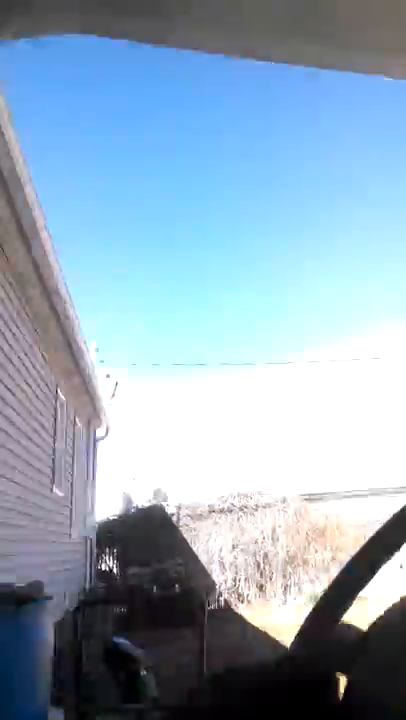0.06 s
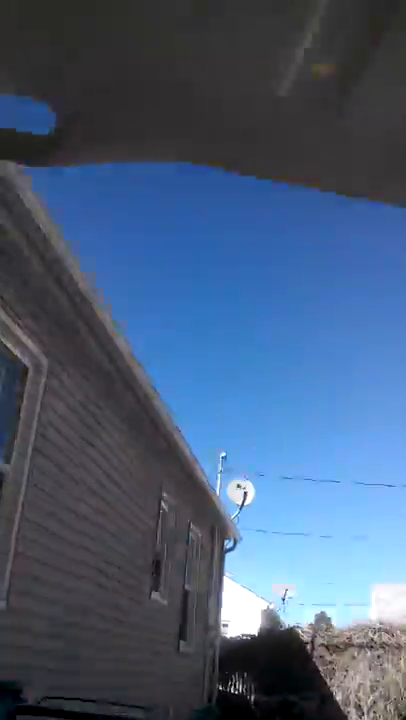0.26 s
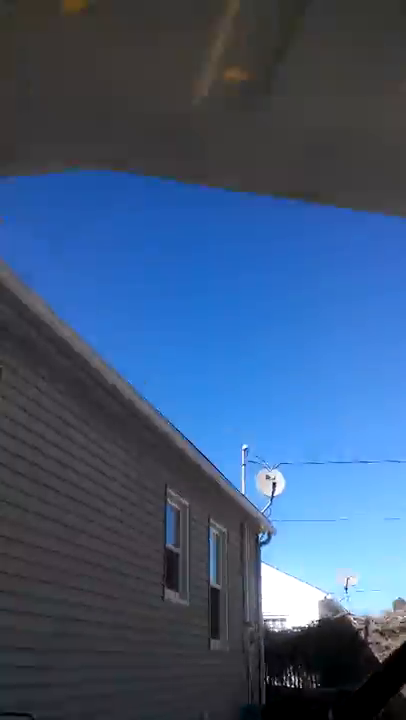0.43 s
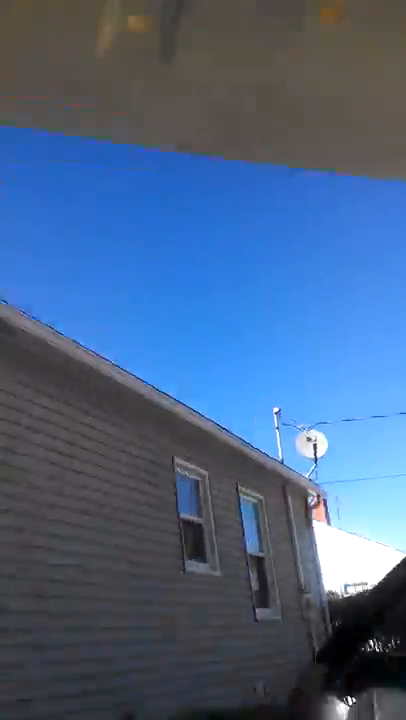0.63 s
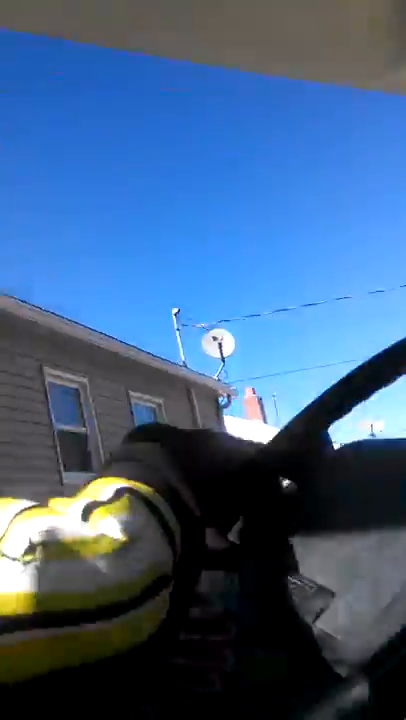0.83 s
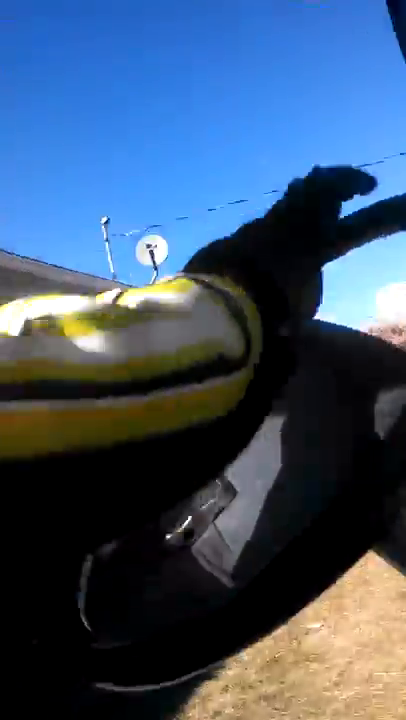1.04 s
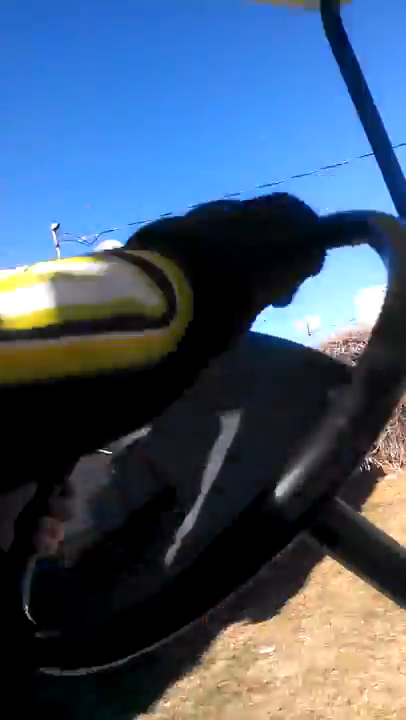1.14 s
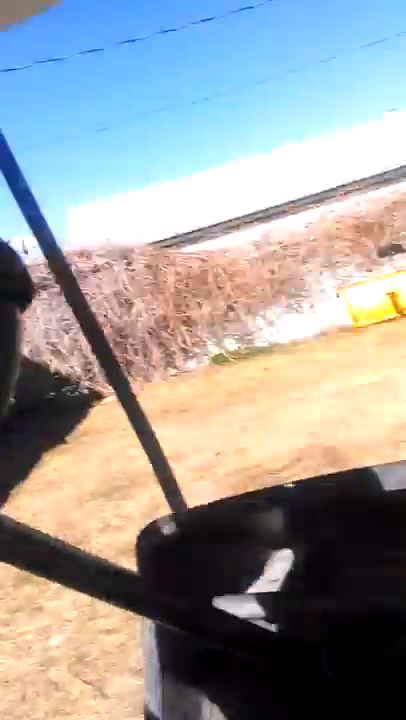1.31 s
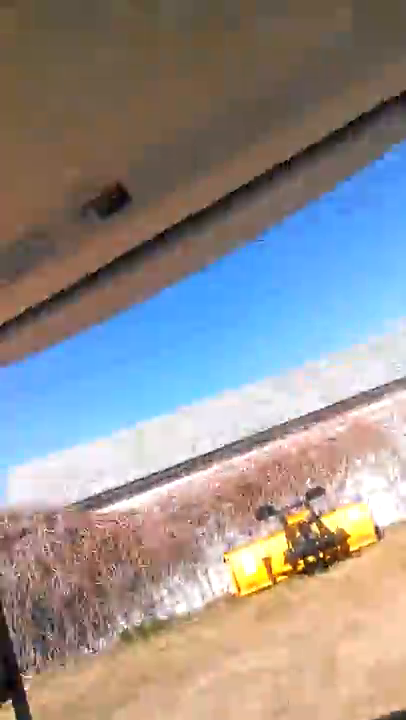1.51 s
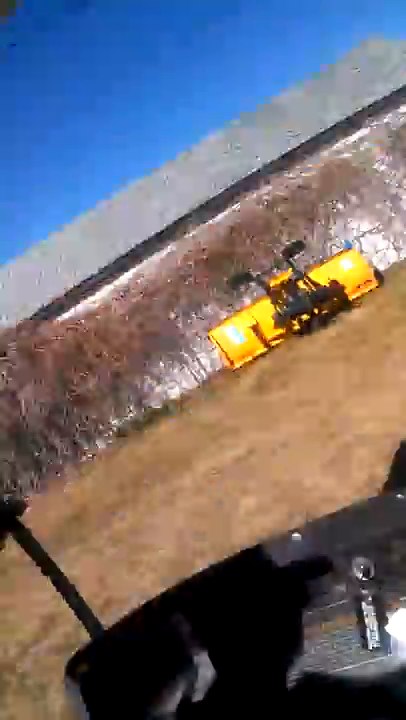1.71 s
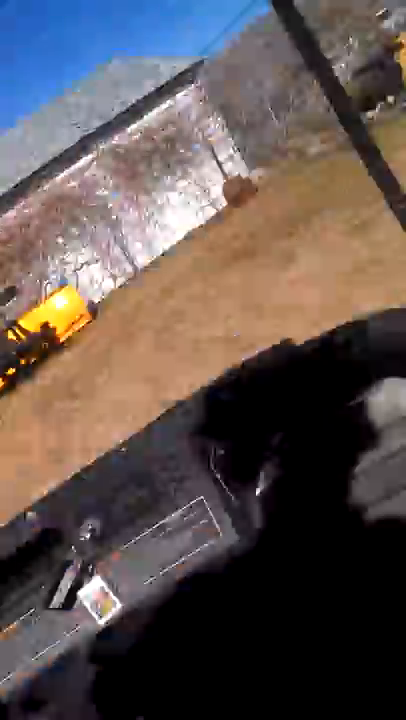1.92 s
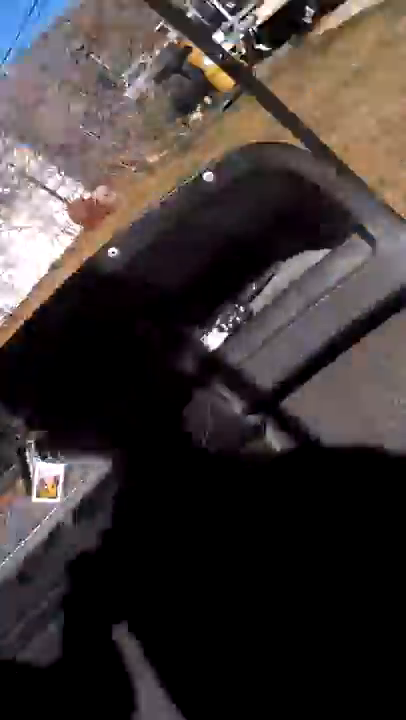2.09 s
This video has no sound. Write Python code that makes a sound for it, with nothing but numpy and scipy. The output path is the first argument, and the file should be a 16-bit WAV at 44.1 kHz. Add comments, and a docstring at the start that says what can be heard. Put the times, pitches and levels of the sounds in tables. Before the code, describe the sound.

A small electric cart rolls over a bumpy yard, heard from a phone held aboard. A quiet low rumble and faint hum open; at 0.24 s a loud roar, crunching grass and hollow plastic knocks burst in, strongest until 0.6. Rattles and sleeve rustle continue, with sharp scraping knocks near 1.0 s. Then it fades to dull thuds, tiny clacks, faint hiss and a very high electric whine.

```python
"""A low rumble and roar swell into a burst of knocks: an electric cart rolls over a bumpy yard.
The tread's roar, made of tiny impacts, rings the plastic body over a crunch of grass and soil.
Air noise and dull jolts buffet the phone in the driver's hand; bumps knock the body, loose parts clack.
A jacket sleeve rustles, scrapes and judders in grains and wavering tones beside the phone.
Behind it all, two low tones of the drive fade under a thin electric whine and a faint hiss."""
import sys
import numpy as np
from scipy import signal
from scipy.fft import rfft, irfft
from scipy.io import wavfile
from scipy.ndimage import uniform_filter1d

SR = 44100
rng = np.random.default_rng(int(sys.argv[2]) if len(sys.argv) > 2 else 0)


def waveform_to_disk(signal):
    """Save audio, clipped to [-1, 1], as 16-bit WAV at the path in sys.argv[1]."""
    frames = np.transpose(np.atleast_2d(signal))
    scaled = np.clip(frames, -1, 1) * 32767
    samples = np.round(scaled).astype(np.int16)
    wavfile.write(sys.argv[1], SR, samples)


N = 94815
T = np.arange(N) / SR  # seconds
LN_60DB = np.log(1000)  # a fall of 60 dB

# Modes of the plastic body. Each row: pitch in Hz, level of a blow's ring in dB, t60 in seconds.
BODY_MODES = [(251.8, 1.5, 0.069), (314.1, 0, 0.088), (341, -7.5, 0.19), (447, -10.5, 0.11),
              (517, -12.5, 0.087), (721, -7.5, 0.054), (994, -7.5, 0.035), (1290, -14, 0.04),
              (1545, -11.5, 0.051), (1800, -15.5, 0.051), (2396, -14, 0.097), (4020, -26, 0.14)]


def undb(db):
    """Decibels to gain."""
    return 10 ** (np.asarray(db) / 20)


def unit(x):
    """Scale to an rms of 1."""
    return x / np.sqrt(np.mean(x ** 2))


def curve(rows):
    """Gain along a curve of (seconds, dB) points."""
    seconds, db = np.array(rows).T
    return undb(np.interp(T, seconds, db))


def walk(rate):
    """Smooth random drift with an rms of 1; a higher rate (per second) drifts faster."""
    width = max(int(SR / rate), 2)
    smooth = uniform_filter1d(rng.standard_normal(N), width, mode="wrap")
    return unit(uniform_filter1d(smooth, width, mode="wrap"))


def wavering_tone(hz, waver, rate):
    """Sine whose pitch drifts by a fraction (rms) of itself."""
    return np.sin(2 * np.pi * np.cumsum(hz * (1 + waver * walk(rate))) / SR)


def ring(x, response):
    """Pass both ports through an impulse response."""
    return signal.fftconvolve(x, response[None], axes=1)[:, :N]


def colour(x, points):
    """Minimum-phase filter of unit energy through (Hz, dB) points."""
    size = 4096
    hz, db = np.array(points).T
    f = np.maximum(np.fft.rfftfreq(size, 1 / SR), 1)
    spectrum_db = np.interp(np.log(f), np.log(hz), db)
    cepstrum = irfft(np.log(undb(spectrum_db)))
    # fold the cepstrum forward in time, so that nothing sounds before its cause
    cepstrum[1:size // 2] *= 2
    cepstrum[size // 2 + 1:] = 0
    response = irfft(np.exp(rfft(cepstrum)))
    return ring(x, response / np.linalg.norm(response))


def ports(x, likeness):
    """Mix two unrelated signals into two with the given correlation."""
    shared = np.sqrt(1 + likeness) * x[0]
    opposed = np.sqrt(1 - likeness) * x[1] * np.array([[1], [-1]])
    return (shared + opposed) / np.sqrt(2)


def grit(rate, spread_db):
    """Two streams of tiny impacts of uneven size, struck at the same random moments (rate per second)."""
    struck = rng.random(N) < rate / SR
    size = undb(spread_db * np.clip(rng.standard_normal(N), -2, 2))
    return unit(struck * size * rng.standard_normal((2, N)))


def bursts(rows, attack_s, decay_s):
    """Envelope of (start s, dB, length s) events that rise, hold and die away; overlaps add in power."""
    power = 0
    for start, db, length in rows:
        rise = np.clip((T - start) / attack_s, 0, 1)
        fall = np.exp(-np.maximum(T - start - length, 0) / decay_s)
        power = power + (undb(db) * rise * fall) ** 2
    return np.sqrt(power)


def ping(hz, t60):
    """A short damped ring of unit energy."""
    t = T[:SR // 40]
    tone = np.sin(2 * np.pi * hz * t) * np.exp(-LN_60DB * t / t60)
    return tone / np.linalg.norm(tone)


def panels(x, ring_db):
    """Add the ringing of the body's modes to a sound, each mode with the same gain."""
    t = T[:SR // 4]
    response = 0
    for hz, _, t60 in BODY_MODES:
        even_gain = 2 * LN_60DB / (t60 * SR)
        response = response + even_gain * np.cos(2 * np.pi * hz * t) * np.exp(-LN_60DB * t / t60)
    return (x + undb(ring_db) * ring(x, response)) / np.sqrt(1 + undb(ring_db))


def tyres():
    """Tread crushing grass and soil: a roar carried by the body and a crunch heard through the air."""
    # Tyre roar before its drift and trim. Each row: time in seconds, level in dB.
    roll_level = [(0, -37), (.22, -30.5), (.245, -16.5), (.31, -22), (.325, -18.5), (.335, -16.5),
                  (.41, -15), (.5, -22.5), (.6, -25.5), (.73, -29.5), (.765, -27.5), (.96, -27), (1.1, -36),
                  (1.37, -40.5), (1.68, -48), (1.9, -41), (2.07, -41.5), (2.15, -32)]
    # Tone of the roar before the body rings. Each row: frequency in Hz, relative density in dB per Hz.
    roll_colour = [(60, -28), (140, 4.5), (300, 8), (420, -1.5), (550, -7.5), (750, -17.5), (1100, -29),
                   (1700, -28.5), (2600, -35), (5000, -40.5), (15000, -68)]
    # Crunch under the tread before its trim. Each row: time in seconds, level in dB.
    crunch_level = [(0, -42.5), (.228, -42.5), (.243, -26), (.3, -36.5), (.324, -37), (.335, -23.5),
                    (.42, -29.5), (.58, -56), (.74, -50), (.76, -28.5), (.81, -47), (.86, -28.5),
                    (.95, -38), (1.06, -40), (1.16, -58), (1.32, -51), (1.39, -41.5), (1.45, -48.5),
                    (1.69, -55), (1.76, -42), (1.82, -61), (1.9, -45), (1.99, -57), (2.15, -40.5)]
    # Filter that tones the crunch. Each row: frequency in Hz, relative gain in dB.
    crunch_colour = [(200, -27), (450, 5.5), (700, 2.5), (1200, -3), (1800, -18.5), (2800, -6), (6000, -24)]
    grains = colour(ports(grit(rate=2500, spread_db=0), likeness=0.81), roll_colour)
    roar = unit(panels(grains, ring_db=-1)) * curve(roll_level)
    crunch = unit(colour(crumbs(), crunch_colour)) * curve(crunch_level)
    return roar * undb(-1.5 + 2 * walk(17)) + undb(-4.5) * crunch


def crumbs():
    """Stalks and crumbs of soil snap one by one, each a brief grain at one of ten pitches."""
    cycles = 5  # cycles of ring until a grain has fallen by 60 dB
    total = 0
    for hz in np.geomspace(400, 4000, 10):
        snaps = ports(grit(rate=170, spread_db=2), likeness=0.15)
        total = total + ring(snaps, ping(hz, cycles / hz))
    return unit(total)


def rumble():
    """Low buffeting of ride and air, a drifting filtered noise, with short dull jolts on top."""
    # Ride and air before their drift. Each row: time in seconds, level in dB.
    rumble_level = [(0, -31.5), (.22, -28), (.34, -19.5), (.52, -23.5), (.68, -32), (.86, -27.5),
                    (.95, -31), (1.3, -35), (1.4, -42), (1.55, -34.5), (1.72, -42.5), (1.93, -34.5),
                    (2.0, -24), (2.05, -36.5), (2.15, -30.5)]
    # Tone of ride and air. Each row: frequency in Hz, relative density in dB per Hz.
    rumble_colour = [(20, -89), (35, -23), (55, 0), (100, 1.5), (150, 0.5), (230, -16.5), (500, -31),
                     (1500, -101)]
    # Jolts of the phone. Each row: peak in seconds, level in dB before the port gains, pitch in Hz.
    thumps = [(0.26, -17, 130), (0.35, -7.5, 240), (0.366, -17, 52), (0.369, -9, 130), (0.3923, -3, 410),
              (0.44, -11.5, 116), (.468, -16, 317), (.525, -15, 105), (0.565, -5.5, 109.5),
              (0.586, -26, 90), (0.634, -20, 109), (0.66, -16.5, 78.4), (.684, -16, 106), (0.704, -20, 60),
              (0.707, -27, 280), (.745, -21.5, 250), (0.79, -16, 95), (0.878, -20, 120), (1.16, -29, 90),
              (1.183, -21.5, 114), (1.23, -22, 90), (1.272, -26, 62), (1.307, -19, 212), (1.317, -20, 74.6),
              (1.459, -26, 78.5), (1.518, -19, 103), (1.521, -27.5, 263), (1.609, -21.5, 148),
              (1.786, -24, 101), (1.826, -30, 70.4), (1.945, -26, 230), (1.991, -19.5, 100),
              (2.029, -18.5, 68.5), (2.073, -21, 79), (2.14, -20, 175)]
    spread_cycles = 0.49  # standard deviation of a jolt's bell-shaped envelope
    noise = colour(ports(rng.standard_normal((2, N)), likeness=0.24), rumble_colour)
    air = noise * curve(rumble_level) * undb(3.5 * walk(14))
    jolts = 0
    for peak, db, hz in thumps:
        bell = np.exp(-((T - peak) * hz / spread_cycles) ** 2 / 2)
        jolts = jolts + undb(db) * np.cos(2 * np.pi * hz * (T - peak)) * bell
    return air + jolts * np.array([[.2], [1.6]])  # the jolts reach mostly the right port


def knocks():
    """Each bump pushes on the body for a moment; a longer contact sounds duller."""
    # Bumps. Each row: start in seconds, level in dB before the trims, contact in seconds.
    bumps = [(0.238, -23, 0.0018), (.247, -23.5, 0.0022), (.26, -15.5, 0.0021), (0.284, -8.5, 0.0069),
             (.335, -23, 0.00072), (.347, -20, 0.0032), (.378, -19.5, 0.0014), (.392, -18, 0.0014),
             (.406, -11, 0.0025), (0.433, -16.5, 0.0037), (0.464, -27.5, 0.00087), (0.495, -17.5, 0.0027),
             (.552, -17.5, 0.0027), (.683, -34, 0.0041), (0.769, -28.5, 0.003), (.991, -13, 0.00063),
             (1.024, -15.5, 0.00054), (1.497, -42, 0.0023), (1.605, -45, 0.0023), (1.89, -40, 0.0016),
             (2.025, -30, 0.0042), (2.138, -39, 0.002)]
    out = np.zeros((2, N + SR))
    t = T[:SR // 50]
    for start, db, contact in bumps:
        first = int(start * SR)
        push = t * np.exp(-t / (contact / 10))  # peaks at a tenth of the contact
        for port in range(2):
            sound = signal.fftconvolve(body(spread_db=4), push / push.sum())
            out[port, first:first + len(sound)] += undb(db + 1) * sound
    return out[:, :N] * np.array([[.8], [.9]])


def body(spread_db):
    """Ring of the body; each mode's weight and pitch vary at random from call to call."""
    t = T[:SR // 8]
    total = 0
    for hz, db, t60 in BODY_MODES:
        gain = undb(db + spread_db * rng.standard_normal())
        varied_hz = hz * (1 + .02 * rng.uniform(-0.84, 1))
        total = total + gain * np.sin(2 * np.pi * varied_hz * t) * np.exp(-LN_60DB * t / t60)
    return total


def clacks():
    """Loose parts hit with a sharp tick and chatter briefly, each ringing at its own pitch."""
    # Hits. Each row: start in seconds, level in dB before the trims, length in seconds, part's pitch in Hz.
    hits = [(0.234, -38, 0.0032, 2120), (.328, -25, 0.0081, 1510), (0.346, -41, 0.0034, 1070),
            (0.39, -20.5, 0.0026, 915), (0.434, -32.5, 0.0016, 1500), (0.549, -32, 0.002, 1930),
            (.552, -29, 0.0029, 530), (0.751, -30, 0.011, 700), (0.81, -36, 0.0023, 1740),
            (0.854, -32, 0.0034, 800), (1.018, -30.5, .003, 1850), (1.023, -28, 0.0041, 510),
            (1.116, -35.5, .001, 3680), (1.187, -31.5, 0.00091, 3060), (1.188, -34.5, 0.0049, 1920),
            (1.191, -36, 0.0025, 540), (1.253, -44, .002, 4360), (1.27, -38.5, 0.0019, 3540),
            (1.274, -33.5, 0.0077, 710), (1.333, -41.5, 0.003, 870), (1.344, -41.5, 0.012, 1920),
            (1.376, -40.5, 0.011, 1920), (1.459, -44, 0.0017, 4300), (1.518, -46.5, 0.0018, 1180),
            (1.768, -50, .002, 3600), (1.895, -47.5, 0.013, 620), (2.004, -51.5, .002, 800),
            (2.099, -45, 0.02, 1190), (2.142, -35.5, 0.0085, 1240)]
    # Filter on the bare contacts. Each row: frequency in Hz, relative gain in dB.
    clack_colour = [(200, -13), (480, 13.5), (700, 14.5), (1000, 2.5), (1900, -1), (3300, -2.5),
                    (4700, -11.5), (8000, -12.5), (15000, -31)]
    contacts, rings = 0, 0
    for start, db, length, hz in hits:
        envelope = bursts([(start, db, length)], attack_s=.0005, decay_s=0.008)
        chatter = ports(grit(rate=4300, spread_db=2), likeness=0.038) * envelope
        chatter[0, int(start * SR)] += undb(db + 18)  # the tick, at the left port alone
        contacts = contacts + chatter
        rings = rings + ring(chatter, ping(hz, t60=0.006))
    return undb(-0.5) * (colour(contacts, clack_colour) + undb(-3.5) * rings) / np.sqrt(2)


def sleeve():
    """Stiff cloth rustles in fine grains and now and then catches in a loud scrape."""
    # Rustle before its drift, body ring and trim. Each row: time in seconds, level in dB.
    rustle_level = [(0, -56), (.23, -56.5), (.25, -35.5), (.3, -46), (.37, -49.5), (.4, -39), (.55, -43.5),
                    (.61, -47), (.69, -51), (.76, -44.5), (.87, -43), (.92, -41.5), (.97, -33.5),
                    (1.04, -41.5), (1.08, -48.5), (1.2, -58), (1.5, -62.5), (2.15, -61)]
    # Tone of the rustle before the body rings. Each row: frequency in Hz, relative density in dB per Hz.
    rustle_colour = [(200, -21.5), (700, 6.5), (1600, -0.5), (2600, -3), (4200, -2), (7000, -7.5),
                     (11000, -11), (15500, -16.5)]
    # Short gritty scrapes. Each row: start in seconds, level in dB before ring and trim, length in seconds.
    scrapes = [(.238, -40.5, 0.0041), (.269, -40, 0.0018), (.38, -33.5, 0.0024), (.405, -21, 0.0083),
               (.457, -26, 0.005), (.481, -34, 0.005), (.513, -34.5, 0.0014), (.527, -32.5, 0.0017),
               (.549, -28, 0.0022), (.563, -34, 0.002), (.621, -35, 0.012), (.752, -39, 0.008),
               (.789, -33.5, 0.0013), (.827, -37, 0.0048), (.904, -36, 0.0041), (.989, -17, 0.0033),
               (1.027, -16.5, 0.0045), (1.1165, -38.5, 0.00076), (1.348, -44, 0.0068), (2.037, -49.5, .002)]
    # Tone of the scrapes before the body rings. Each row: frequency in Hz, relative density in dB per Hz.
    scrape_colour = [(200, 9.5), (700, -6), (1600, 1), (2600, -1), (4200, 1), (7000, -3.5), (11000, -5),
                     (15500, -13)]
    fine = ports(grit(rate=12000, spread_db=3), likeness=0.011)
    rustle = colour(fine, rustle_colour) * curve(rustle_level) * undb(2 * walk(67))
    rough = ports(grit(rate=12000, spread_db=3), likeness=0.061)
    scrape = colour(rough * bursts(scrapes, attack_s=.001, decay_s=0.0066), scrape_colour)
    return panels(rustle + scrape, ring_db=-4.5) * undb(np.array([[4.5], [-1.5]]))  # stronger at the left


def judders():
    """The catching sleeve sticks and slips, shaking the phone for a few uneven cycles."""
    # Slips. Each row: start in seconds, level in dB before the trims, length in seconds, mean pitch in Hz.
    slips = [(0.341, -13.5, 0.009, 245), (0.419, -19.5, 0.0098, 315), (0.517, -21, 0.011, 310),
             (0.616, -22.5, 0.0095, 290), (0.642, -26.5, 0.0051, 340), (0.851, -19.5, 0.011, 304.5),
             (0.988, -13, 0.0076, 305), (1.006, -15, 0.0076, 275), (1.021, -12.5, 0.0059, 300)]
    shake = 0
    for start, db, length, hz in slips:
        envelope = bursts([(start, db, length)], attack_s=0.0022, decay_s=0.012)
        shake = shake + envelope * wavering_tone(hz, waver=0.0603, rate=149)
    return undb(2) * shake * np.array([[1.1], [1.7]])  # felt most at the right port


def hum():
    """The drive hums in two tones of nearly steady pitch and fades."""
    # Tones. Each row: mean pitch in Hz, rms level in dB before drift and fade.
    hum_tones = [(307, -48.5), (635, -49.5)]
    fade_db_per_s = 13.5
    tones = sum(undb(db + 2 * walk(19)) * wavering_tone(hz, waver=.004, rate=20) for hz, db in hum_tones)
    return np.sqrt(2) * tones * undb(-fade_db_per_s * T)


def whine():
    """A thin electric tone over a faint filtered-noise hiss that swells and sinks with it."""
    # Whine before its drift and trim. Each row: time in seconds, level in dB.
    whine_level = [(0, -59), (.37, -55), (.41, -62.5), (.95, -58.5), (1.06, -68), (2.15, -57)]
    # Tone of the hiss. Each row: frequency in Hz, relative density in dB per Hz.
    hiss_colour = [(300, 11), (1500, 12), (2600, -8), (4000, -3), (7000, -7.5), (10000, -1.5), (15000, -20)]
    level = curve(whine_level)
    tone = np.sqrt(2) * wavering_tone(12208, waver=.00005, rate=6.7)
    hiss = colour(ports(rng.standard_normal((2, N)), likeness=0.044), hiss_colour)
    return undb(1.5) * level * tone * undb(.5 * walk(60)) + undb(-61) * unit(level) * hiss


def scene():
    """All sounds at the two microphone ports."""
    return tyres() + rumble() + knocks() + clacks() + sleeve() + judders() + hum() + whine()


def record(dry):
    """The phone widens the stereo by taking each port, delayed, from the other, rounds peaks, cuts the top."""
    cross, lag_samples, top_hz = .98, 16, 15700
    delayed = np.pad(dry[::-1], ((0, 0), (lag_samples, 0)))[:, :N]
    wide = (dry - cross * delayed) / np.sqrt(1 + cross ** 2)
    rounded = np.tanh(wide * undb(np.array([[-1], [1]])))  # right side driven 2 dB harder than the left
    lowpass = signal.ellip(10, .2, 80, top_hz, fs=SR, output="sos")
    return signal.sosfilt(lowpass, rounded)


dry = scene()
out = record(dry)
waveform_to_disk(out)
```